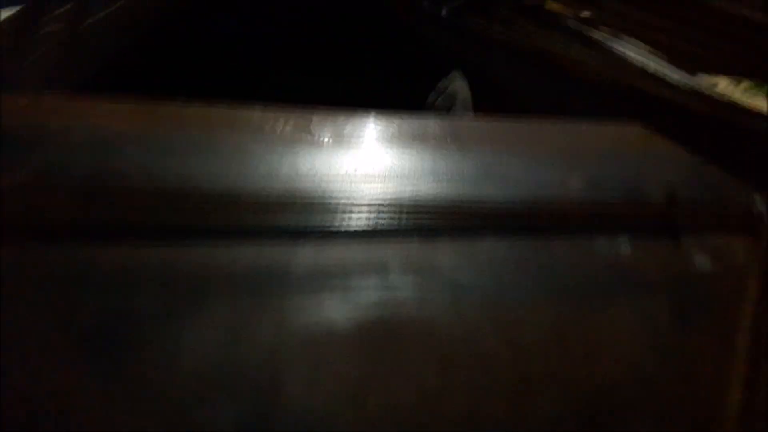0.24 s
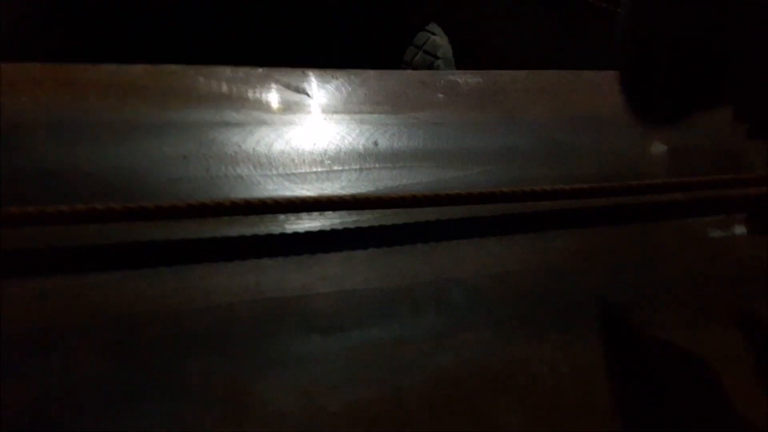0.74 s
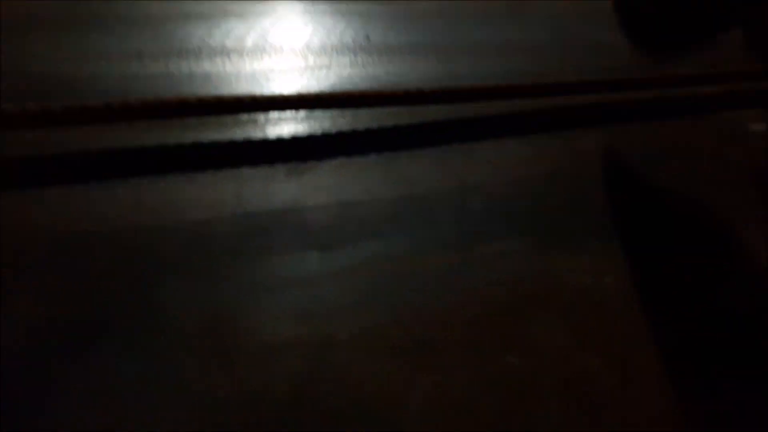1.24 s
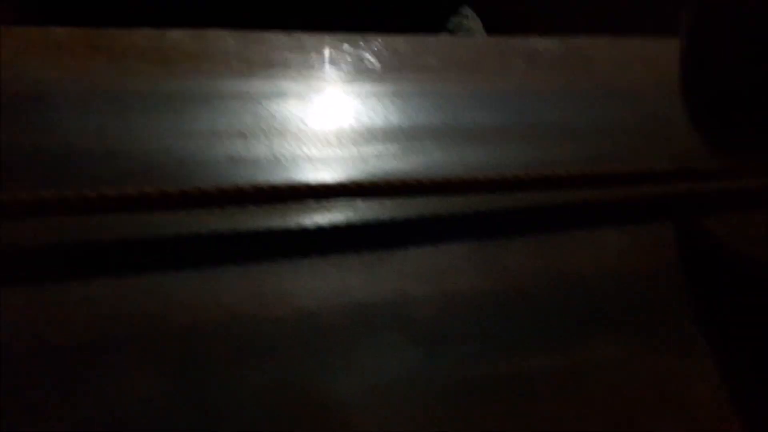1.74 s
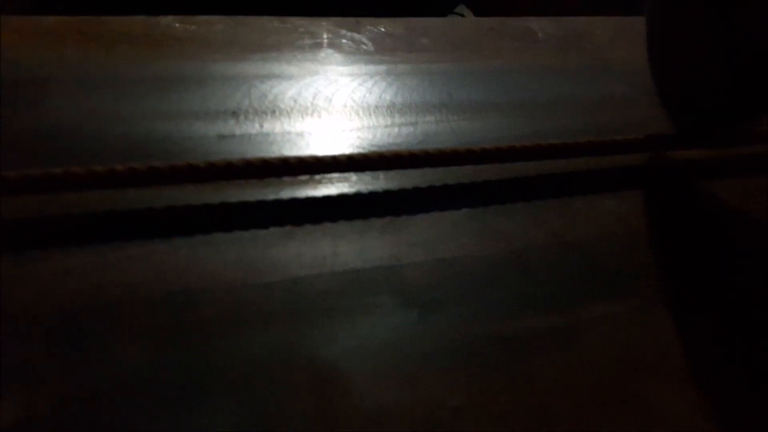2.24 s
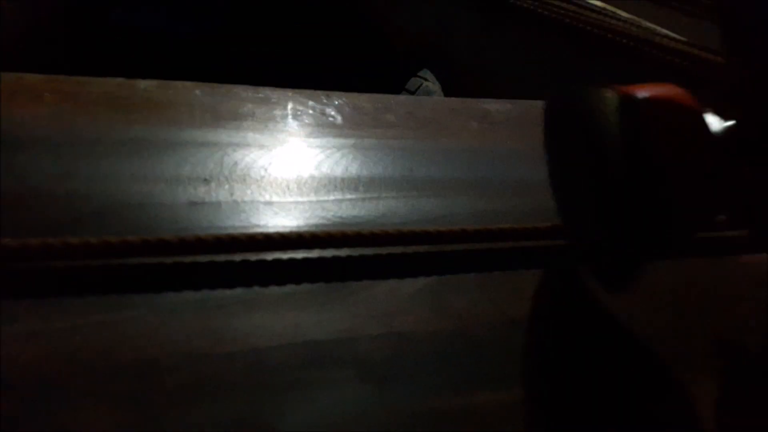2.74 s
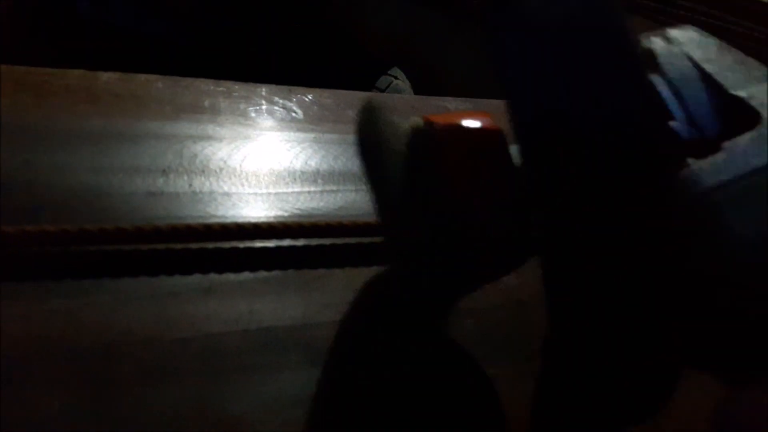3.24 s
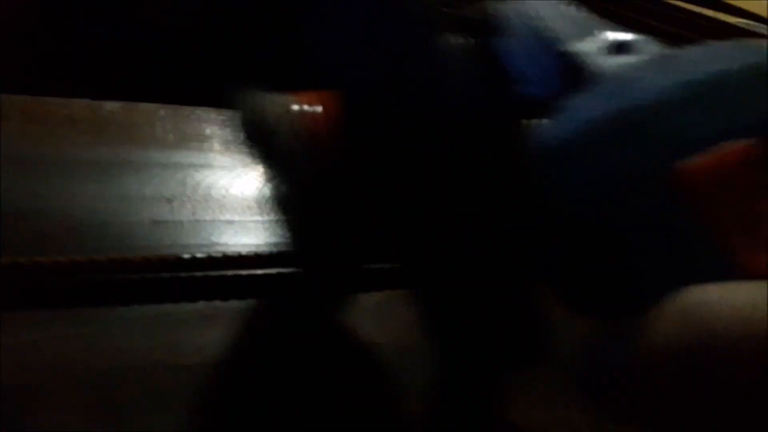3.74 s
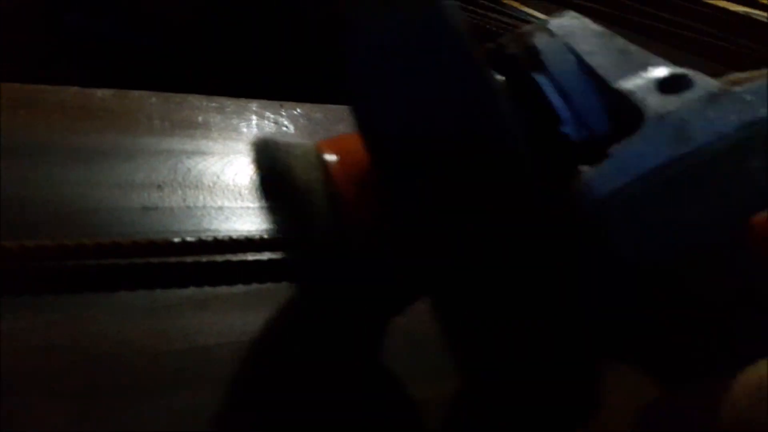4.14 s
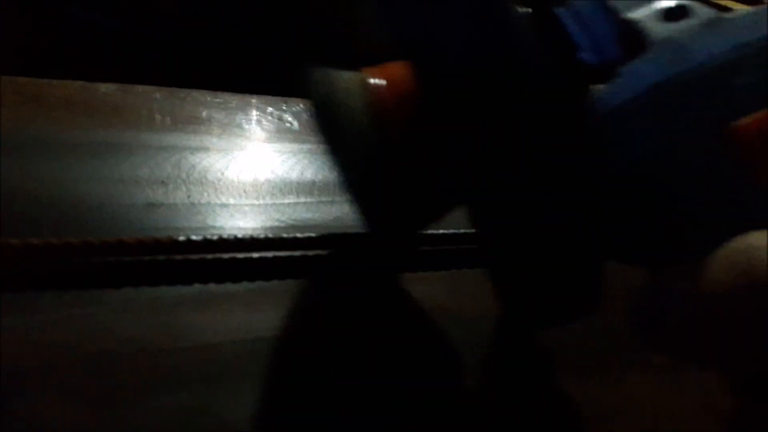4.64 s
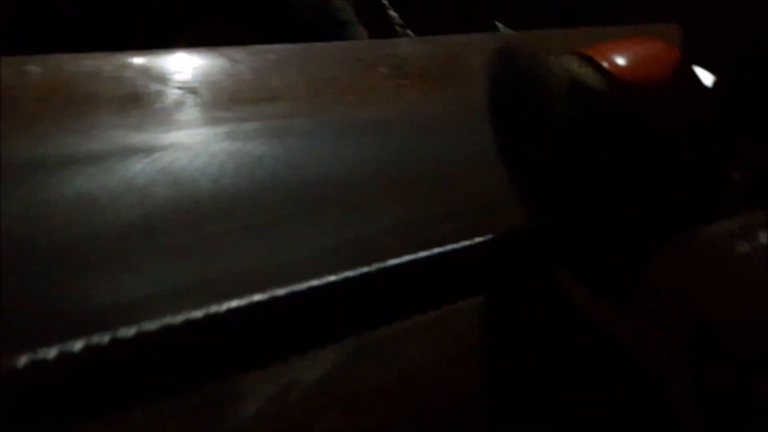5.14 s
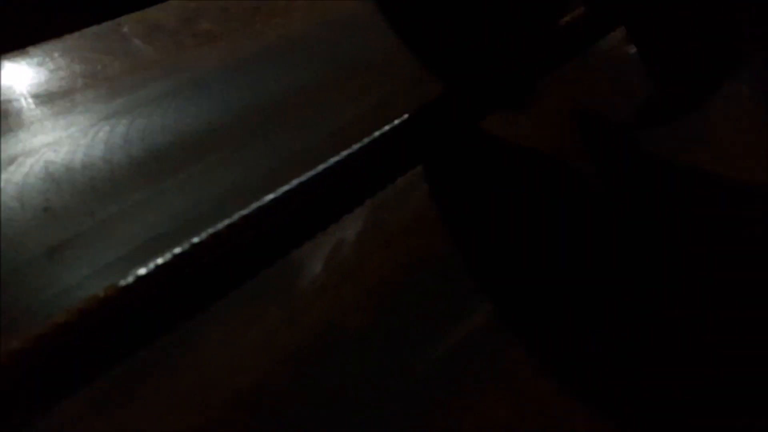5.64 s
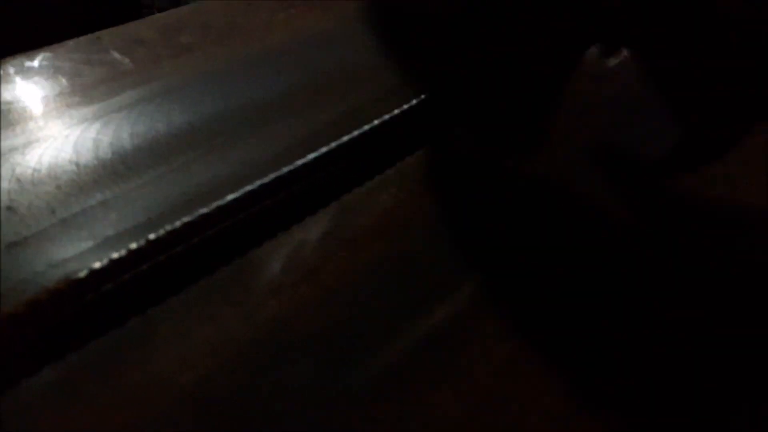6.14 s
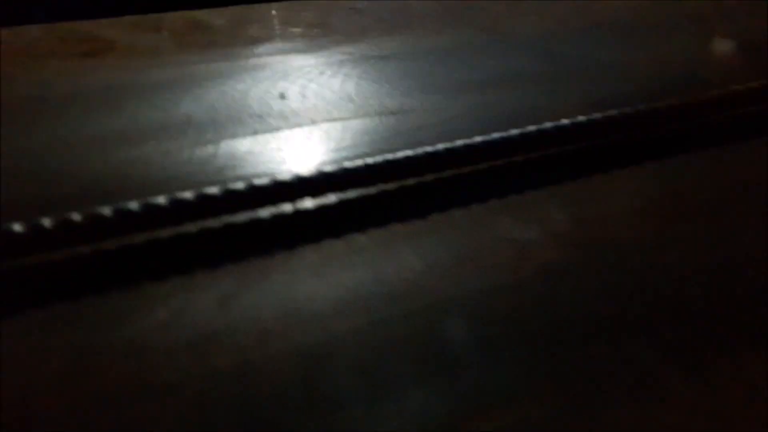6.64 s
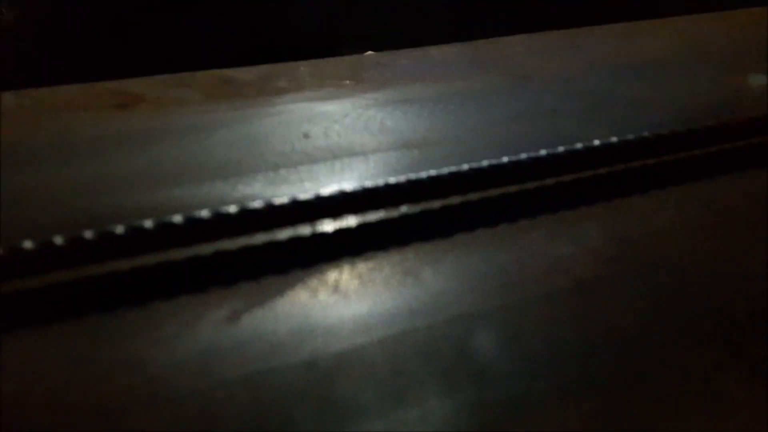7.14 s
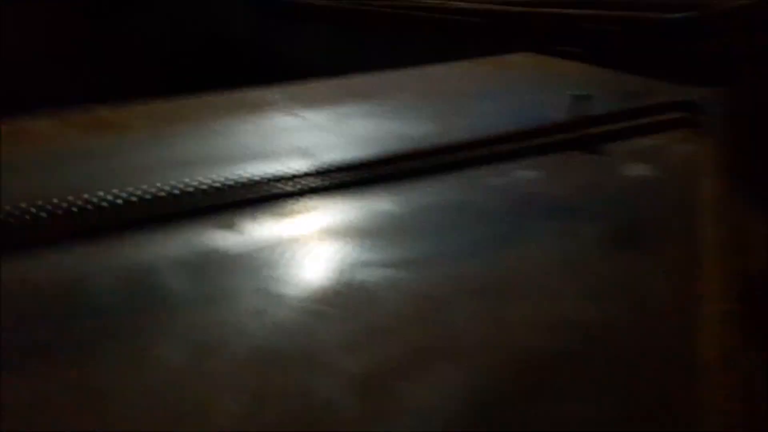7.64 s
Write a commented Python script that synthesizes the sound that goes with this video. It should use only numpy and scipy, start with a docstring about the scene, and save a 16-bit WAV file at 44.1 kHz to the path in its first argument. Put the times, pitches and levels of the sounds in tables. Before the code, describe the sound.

An angle grinder with a wire brush spins up in a loud roar, then drops abruptly to a thin, hissing rasp of wires scrubbing rusty steel.

```python
"""Beside a steel bar on a plate, close to the work: an angle grinder with a wire cup brush spins up and scrubs rust.
A loud, dull roar of filtered impacts and air, surging at twice the mains rate, lies under a rising fan whistle.
Then the sound turns abruptly thin and quieter: a hiss of wire strikes, with bites, grit knocks and one squeal.
Tones follow the armature, which sags at each press of the wires and runs free near the end.
Draught flutters on the two microphone ports as bursts of filtered noise."""
import sys
import numpy as np
from scipy import signal
from scipy.fft import rfft, irfft, next_fast_len
from scipy.io import wavfile
from scipy.ndimage import uniform_filter1d, map_coordinates

SR = 44100
rng = np.random.default_rng(int(sys.argv[2]) if len(sys.argv) > 2 else 0)


def bounce(signal):
    """Save signal as a 16-bit WAV file at the path given by the first command-line argument."""
    frames = np.transpose(np.atleast_2d(signal))
    limited = np.clip(frames, -1, 1)
    pcm = np.round(limited * 32767).astype(np.int16)
    wavfile.write(sys.argv[1], SR, pcm)


N = 347508
T = np.arange(N) / SR  # seconds
THIN_S = 2.527  # the sound turns thin
FREE_HZ, CREST_HZ = 560.7, 513.5  # armature turns a second: running free, crest of the spin-up


def amp(db):
    """Level law: decibels to amplitude gain."""
    return 10 ** (np.asarray(db) / 20)


def unit(x):
    """Normalisation: x scaled to rms 1."""
    return x / np.sqrt(np.mean(x ** 2) + 1e-20)


def ramp(x):
    """Saturation: x held between 0 and 1."""
    return np.clip(x, 0, 1)


def curves(rows):
    """Linear interpolation in time: one value per sample for each column after the time."""
    s, *cols = np.transpose(rows)
    return [np.interp(T, s, c) for c in cols]


def along(points, hz):
    """Spectral interpolation: each column of a table read on a log-frequency axis."""
    f, *cols = np.transpose(points)
    return np.array([np.interp(np.log(hz + 1), np.log(f), c) for c in cols])


def wobble(rate):
    """Slow random modulation: a smooth curve through rate random knots a second."""
    knots = rng.standard_normal(int(N * rate / SR) + 4)
    fine = np.arange(0, len(knots), 1 / 8)
    return np.interp(T * rate, fine, map_coordinates(knots, [fine], mode="nearest"))


def swell(s, half):
    """Gaussian envelope: a rise and fall around s, with standard deviation half, in seconds."""
    return np.exp(-.5 * np.minimum(((T - s) / half) ** 2, 60))


def filtered(x, response):
    """Linear filtering: the spectrum of x times a response of frequency."""
    size = next_fast_len(N + 8192)
    return irfft(rfft(x, size) * response(np.fft.rfftfreq(size, 1 / SR)), size)[..., :N]


def below(hz, edge_hz):
    """Low-pass law: gain falls smoothly through one half at the edge."""
    return 1 / (1 + (hz / edge_hz) ** 4)


def panned(lean_db):
    """Level difference between ports: left and right gains of constant power, positive to the left."""
    gains = amp(np.array([lean_db, -lean_db]).reshape(2, -1) / 2)
    return gains / np.sqrt(np.mean(gains ** 2, axis=0))


def ticks(rate, spread_db):
    """Shot noise: three unrelated streams of tiny impacts of scattered size, rate a second."""
    hit = rng.random((3, N)) < rate / SR
    sizes = amp(spread_db * rng.standard_normal((3, N)))
    return unit(hit * rng.standard_normal((3, N)) * sizes)


def rasp(spindle, rate, spread_db, air, throb):
    """Modulated shot noise: wire tips strike in a rush of air; the uneven brush bites harder once a turn."""
    bite = np.exp(throb * np.sin(spindle + 0.81 * wobble(12)))
    grain = ticks(rate, spread_db) + air * rng.standard_normal((3, N))
    return bite * grain / np.sqrt(np.i0(2 * throb))  # the Bessel term keeps mean power steady


# the tool moves in front of the ports: start_s, left_port_lag_ms
PORT_LAG = [(0, 0.34), (2.5, 0.28), (2.6, 0.068), (3.5, 0.023), (5, 0.032), (6, 0.055), (6.7, 0.11),
            (7.5, 0.12), (7.88, 0.064)]
# likeness of the two ports: frequency_hz, shared_power (0-1)
PORT_LIKENESS = [(100, 0.8), (1500, 0.7), (3000, 0.61), (6000, 0.39), (12000, 0.2), (15000, 0.2)]


def at_ports(streams, colour):
    """Coherence: one stream reaches both ports, the left one later; the other two are scattered sound."""
    lag_ms = curves(PORT_LAG)[0]
    late = map_coordinates(streams[0], [(T - lag_ms / 1000) * SR])
    direct = np.array([late, streams[0]])
    share = lambda hz: ramp(along(PORT_LIKENESS, hz))
    coherent = filtered(direct, lambda hz: np.sqrt(share(hz)))
    scattered = filtered(streams[1:], lambda hz: np.sqrt(1 - share(hz)))
    return unit(filtered(coherent + scattered, lambda hz: amp(along(colour, hz))))


START_HZ, CREST_S, SPIN_CURVE = 170, 2.04, 2.12  # spin-up: first turns a second, crest time, curvature
# time constant of recovery; the rotor's mass rounds off each change of speed over this span
RECOVER_S, INERTIA_S = .18, 0.072
# the brush is pressed on, then eased off: hardest_push_s, armature_sag_hz (before rounding), leaning_in_s
PRESS_TABLE = [(2.57, 22, .3), (2.94, 25, .26), (3.11, 42, .22), (3.57, 41, .19), (3.83, 54, .28),
               (4.21, 20, .6), (4.57, 44, .27), (4.71, 41, .2), (4.96, 31, .29), (5.26, 30, .25),
               (5.41, 46, .18), (5.72, 36, .21), (6.04, 16, .27), (6.239, 16, .12), (7.87, 22, .12)]


def armature_speed():
    """Torque balance: a spin-up that levels and eases back, then free speed less the sag of every press."""
    spin_up = CREST_HZ - (CREST_HZ - START_HZ) * np.abs(1 - T / CREST_S) ** SPIN_CURVE
    sag = np.zeros(N)
    for s, sag_hz, lean_s in PRESS_TABLE:
        push = ramp(1 + (T - s) / lean_s)
        recovery = np.exp(-np.maximum(T - s, 0) / RECOVER_S)
        sag += sag_hz * push * recovery
    worked = FREE_HZ - uniform_filter1d(sag, size=round(INERTIA_S * SR))
    return np.where(T < THIN_S, spin_up, worked)


MAINS_HZ, FIRST_SURGE_S, SURGE_DEPTH = 50.18, .0017, 0.38


def surging(strain):
    """Amplitude modulation: heavy starting current shakes the motor each half cycle, never twice alike."""
    depth = SURGE_DEPTH * strain * np.exp(0.3 * wobble(100.7))
    half_cycles = np.cos(2 * np.pi * 2 * MAINS_HZ * (T - FIRST_SURGE_S))
    return np.exp(depth * half_cycles) / np.sqrt(np.i0(2 * depth))


def settling():
    """Linear decay of the excess level: from 1 to 0 just after the sound turns thin."""
    end_s, fall_s = 3.12, 0.47
    return ramp((end_s - T) / fall_s)


# the brush catches and throws dusty air: start_s (centre), level_db, left_minus_right_db, half_length_s
CATCH_TABLE = [(2.64, -48.5, -20, .02), (2.803, -54, -24, 0.14), (3.252, -58.5, -5, .047),
               (3.705, -57, 16, 0.036), (5.146, -58, -17, 0.12), (5.355, -57.5, 8, 0.052),
               (5.643, -54, 13, 0.049), (5.82, -56.5, -9, 0.027), (6.002, -58, 6, 0.049),
               (6.167, -58.5, 9, 0.036), (6.358, -52, -19, .015), (6.55, -48.5, -28, 0.034),
               (7.84, -57, -6, .021)]


def catching():
    """Power summation: the combined strength of the brush's catches at each port."""
    power = 0
    for s, db, lean_db, half in CATCH_TABLE:
        power = power + (amp(db) * panned(lean_db) * swell(s, half)) ** 2
    return np.sqrt(power)


def draught(catch, load):
    """Turbulent pressure: dusty air crackles on the ports in each catch, with weak stray puffs under load."""
    stray_db, swing_db = -71.5, 4.2
    stray = load * amp(stray_db + swing_db * np.array([wobble(7.4), wobble(9)]))
    lumps = amp(2.7 * np.array([wobble(70), wobble(70)]))
    dust = ticks(rate=1500, spread_db=1.0)[:2]
    flutter = lumps * (dust + .5 * rng.standard_normal((2, N)))
    # frequency_hz, level_db
    colour = [(50, -34), (150, -18), (300, -3.5), (700, 1.5), (1400, 0.0), (2600, -2.0), (5000, -27)]
    return np.hypot(catch, stray) * unit(filtered(flutter, lambda hz: amp(along(colour, hz))))


def tail():
    """Exponential decay: the low mids of the roar ring on briefly."""
    level_db, decay_s = -42, 0.022
    noise = filtered(rng.standard_normal((2, N)), lambda hz: below(hz, 1300) * (1 - below(hz, 300)))
    decay = np.exp(-np.maximum(T - THIN_S, 0) / decay_s)
    return amp(level_db) * decay * unit(noise) * panned(-8)


# flung grit strikes beside the ports: start_s, level_db, left_minus_right_db, upper_edge_hz
KNOCK_TABLE = [(2.618, -47, -20, 1200), (2.635, -45, -22, 900), (2.659, -41, -18, 2000),
               (2.748, -38.5, -20, 1600), (2.815, -45.5, -17, 900), (2.86, -50, -16, 2000),
               (3.026, -49, -20, 1100), (3.72, -51, 14, 1500), (4.757, -52, -14, 1000),
               (5.05, -52, -14, 1400), (5.126, -51, -18, 1300), (5.207, -52, -16, 1200),
               (5.562, -49, 14, 2000), (5.612, -51, 14, 1500), (5.66, -47, 14, 2000),
               (5.674, -47, 18, 2000), (6.357, -52, -18, 1800), (6.365, -42, -18, 2200),
               (6.499, -49, -20, 800), (6.5325, -41, -24, 1700), (6.546, -42, -26, 2800),
               (6.550, -39.5, -26, 2400), (6.5575, -34, -28, 2700), (6.567, -38.5, -26, 3000),
               (6.573, -35, -26, 2900), (6.605, -48, -18, 1500), (7.737, -57, -12, 1200),
               (7.835, -52, -12, 1000)]
KNOCK_LOW_HZ, KNOCK_DECAY_S, KNOCK_ROUGH = 240, 0.0014, 0.14


def knocks():
    """Band-limited impulse: each knock of grit is one dead push with a brief rough tail."""
    out = np.zeros((2, N + SR))
    age = T[:SR // 50]
    window = .0017 * SR  # level_db is the rms over these samples
    for s, db, lean_db, edge_hz in KNOCK_TABLE:
        rough = KNOCK_ROUGH * np.exp(-age / KNOCK_DECAY_S) * rng.standard_normal(len(age))
        band = signal.butter(3, [KNOCK_LOW_HZ, edge_hz], "band", fs=SR, output="sos")
        knock = signal.sosfilt(band, (age == 0) + rough)
        knock = knock * np.sqrt(window / np.sum(knock ** 2))
        out[:, round(s * SR):][:, :len(age)] += amp(db) * knock * panned(lean_db)
    return out[:, :N]


def hum(spindle, pace):
    """Rotating unbalance: the brush shakes the tool once a turn, with harmonics, harder with speed."""
    shake = amp(-55.5) * np.sin(spindle)
    shake += amp(-60.5) * np.sin(2 * spindle)
    shake += amp(-56) * np.sin(3 * spindle + .25 * wobble(60))
    return np.sqrt(2) * shake * ramp((pace - .35) / .3) * amp(wobble(10.9)) * panned(-7)


def squeal():
    """Self-excited vibration: one mode of the bar starts to sing during a push and dies away."""
    start_s, pitch_hz, level_db, decay_s = 4.615, 5500, -42, 0.12
    age = np.maximum(T - start_s, 0)
    level = amp(level_db + 3.0 * wobble(40.2)) * ramp(age / 0.0091) * np.exp(-age / decay_s)
    return level * np.sqrt(2) * np.sin(2 * np.pi * pitch_hz * T + .5 * wobble(120))


# hard clacks in the tool, mostly as the surges jolt the gears: start_s (centre), level_db, half_length_s
CLACK_TABLE = [(.003, -22, 0.0009), (.04, -22, 0.0011), (.09, -22.5, .001), (.13, -24, .001),
               (.17, -25, .001), (.25, -21, .0012), (.269, -22, 0.00088), (.289, -18.5, .001),
               (.398, -20, .0016), (.439, -21, .001), (.457, -21, 0.0018), (.498, -24, 0.00098),
               (.529, -22, 0.00089), (.578, -18, .001), (.619, -18, .0013), (.662, -22, .003),
               (7.619, -37, .0025)]
# colour of a clack: frequency_hz, left_db, right_db
CLACK_SPECTRUM = [(150, -70, -65), (1000, -15, -12), (1900, -1, 0), (3200, -11, -1), (5000, -26, -7),
                  (6800, -37, -11), (9000, -50, -30)]


def clacks():
    """Impact noise: each clack is a hard burst of a few milliseconds."""
    level = sum(amp(db) * swell(s, half) for s, db, half in CLACK_TABLE)
    return level * at_ports(rng.standard_normal((3, N)), CLACK_SPECTRUM)


# modes of the steel under the blows of the wires: pitch_hz, width_hz, level_db (relative)
STEEL_MODES = [(294, 12, -8.5), (402, 12, -7), (1800, 99, 0), (2030, 100, -5), (3710, 90, 1.5),
               (4260, 39, -8)]


def steel(spindle, pace, strain):
    """Modal resonance: wire strikes ring the bar and the plate under it, less as the blows merge."""
    slow_db, fast_db, fade_pace, fade_span = -31.5, -44, 0.59, 0.32
    drive = surging(strain) * rasp(spindle, rate=9000, spread_db=0.5, air=0.53, throb=0.091)[:2]

    def modes(hz):
        total = 0
        for centre, width, db in STEEL_MODES:
            damping = 1j * hz * width
            total = total + amp(db) * damping / (centre ** 2 - hz ** 2 + damping)
        return total

    merged = ramp((pace - fade_pace) / fade_span)
    level = amp((1 - merged) * slow_db + merged * fast_db)
    return level * unit(filtered(drive, modes)) * panned(-12.0)


# rough gear and commutator bands: armature_multiple, level_db, width_hz, fade_pitch_hz
CHATTER_BANDS = [(7, -38.5, 240, 3000), (12, -41.5, 310, 7500), (24, -43, 380, 7400)]
# resonances of the housing: pitch_hz, width_hz, boost_db
HOUSING_MODES = [(2650, 200, 6), (3750, 260, 9.5), (4400, 230, 7.5), (5500, 310, 4), (6900, 600, 7)]


def flares(armature, speed):
    """Resonant crossing: rough bands glide up with the shaft and swell at the housing's resonances."""
    steady_core, break_up_db = 0.49, 2.5
    out = np.zeros((2, N))
    for multiple, db, width_hz, fade_hz in CHATTER_BANDS:
        hz, phase = multiple * speed, multiple * armature
        boost_db = sum(peak_db / (1 + ((hz - centre) / width) ** 2) for centre, width, peak_db in HOUSING_MODES)
        in_phase = (steady_core + wobble(width_hz)) * np.sin(phase)
        band = unit(in_phase + wobble(width_hz) * np.cos(phase))
        level = amp(db + boost_db + break_up_db * wobble(28)) * below(hz, fade_hz) ** 2
        out += level * band * panned(-4.5 * hz / 1000)
    return out


# the fan whistle's level at each pitch, strongest near 14.7 kHz, very faint at the top:
# pitch_hz, level_db (before a fixed trim)
WHISTLE_LEVELS = [(5500, -46), (7300, -42.5), (8100, -48), (10100, -39.5), (11150, -36.5), (12100, -45),
                  (12850, -47), (13400, -33), (14300, -22.5), (14700, -21), (15000, -28), (15660, -25),
                  (15770, -33), (15850, -52)]
FAN_BLADES = 31


def whistle(armature, speed):
    """Blade-passing tone: the fan's pitch, blurred by turbulence, climbs to the edge of hearing."""
    level = amp(along(WHISTLE_LEVELS, FAN_BLADES * speed)[0] - 2.5 + 2.1 * wobble(30.35))
    return level * np.sqrt(2) * np.sin(FAN_BLADES * armature + .5 * wobble(200)) * panned(-26.5)


# tones of armature, bearings and commutator:
# armature_multiple, opening_db (before the starting boost), scrubbing_db, free_db, phase_blur_rad
TONE_TABLE = [(1, -50, -70.5, -62, 0.14), (2, -55, -74.5, -72, 0.28), (3, -53, -69.5, -63.5, 0.29),
              (3.7, -61, -58, -58, 0.13), (4, -50, -67, -56.5, 0.38), (6, -54, -69, -76, 0.59),
              (7.4, -55, -65, -62, .5), (12, -62, -64, -77, 0.73), (14.8, -64.5, -67, -50, 0.62)]


def motor(armature, opening, load, strain):
    """Shaft orders: tones locked to the armature, each wavering in strength and blurred in phase."""
    out = np.zeros((2, N))
    for multiple, opening_db, scrub_db, free_db, blur in TONE_TABLE:
        start_boost_db = 8.0 * strain * (multiple == 1)
        thin_level = amp(load * scrub_db + (1 - load) * free_db)
        level = opening * amp(opening_db + start_boost_db) + (1 - opening) * thin_level
        waver = amp((0.5 + 0.8 * load + 0.5 * opening) * wobble(11))
        lean_db = opening * (-3.5 - 1.5 * multiple) + (1 - opening) * (-1.5 * load - 11 * (1 - load))
        tone = np.sqrt(2) * np.sin(multiple * armature + blur * wobble(130))
        out += panned(lean_db) * level * waver * tone
    return out


# resonances of housing and bar in the roar: start_s (centre), half_length_s, pitch_hz, half_width_hz, boost_db
ROAR_RESONANCES = [(.36, .1, 1050, 220, 4), (.35, .2, 4260, 90, 1), (.08, .12, 1430, 200, -3),
                   (.93, .14, 2700, 200, 2.5), (1.05, 0.15, 860, 200, 1), (1.6, .2, 3500, 170, 3),
                   (2.36, .15, 3850, 110, 5.5)]


def shifting(pair):
    """Time-varying resonance: bands of the roar are shaped in turn, over a weaker random play of colour."""
    patchy_db = 1.0
    hz, s, z = signal.stft(pair, SR, nperseg=1024)
    boost_db = 0
    for at, half, centre, width, db in ROAR_RESONANCES:
        boost_db = boost_db + db * np.exp(-.5 * ((s - at) / half) ** 2) * below(hz[:, None] - centre, width)
    patches = uniform_filter1d(rng.standard_normal(z.shape[1:]), size=6, axis=0)
    patches = uniform_filter1d(patches, size=9, axis=1)
    return signal.istft(z * amp(boost_db + patchy_db * unit(patches)), SR, nperseg=1024)[1][:, :N]


# the opening roar: start_s, rasp_db, body_db (both before fixed trims)
ROAR_LEVELS = [(0, -28, -32), (.17, -25.5, -30), (.34, -23.5, -28), (1.06, -22.5, -24), (1.27, -24.5, -28),
               (1.55, -23, -26), (2.52, -22.5, -26.5)]
# colour of the opening roar: frequency_hz, left_db, right_db
ROAR_SPECTRUM = [(40, -58, -41), (200, -32.5, -28), (397, -22.5, -17), (573, -10, -6), (960, -7, -2.5),
                 (1200, -5.5, -2.5), (1500, -2.5, -0.5), (1890, -4.5, -2.5), (2130, -3.5, 2.5),
                 (2350, -11.5, -0.5), (2700, -14.5, 1), (3000, -13.5, 1), (3600, -21.5, -0.5),
                 (4300, -23, -4), (5040, -28, -7.5), (5350, -30, -4), (6430, -39, -4.5), (6980, -40, -9),
                 (8630, -54, -24), (12100, -39, -16.5), (15000, -42, -19.5)]
# the draught buffets the ports: start_s, end_s, level_db (before a random swing)
BUFFET_TABLE = [(0, 0.933, -49), (2.405, 2.48, -46)]
RUMBLE_DB, BUFFET_EDGE_S, CLUMP_DB = -57.5, 0.033, 1.5  # rumble floor, buffet fade, clumping of the grain


def roar(spindle, pace, strain):
    """Broadband noise of gears, fan and wires: a hard rattle at twice the mains rate that smooths out."""
    rasp_db, body_db = curves(ROAR_LEVELS)
    buffets = np.zeros(N)
    for start, end, db in BUFFET_TABLE:
        buffets += amp(db) * ramp(np.minimum(T - start, end - T) / BUFFET_EDGE_S + .5)
    beats = rasp(spindle, rate=14000, spread_db=1.0, air=0.88, throb=0.04)
    noise = shifting(at_ports(beats, ROAR_SPECTRUM))
    # the airy top comes in only with speed, last on the left
    missing = 1 - np.array([pace ** 2.8, pace ** 1.4])
    noise = noise - missing * filtered(noise, lambda hz: 1 - below(hz, 6600) ** .5)
    low = filtered(noise, lambda hz: below(hz, 2030))
    rumble = filtered(noise, lambda hz: below(hz, 295))
    bass = np.maximum(amp(RUMBLE_DB), buffets) * amp(2.5 * wobble(13)) * unit(rumble)
    rattle = surging(strain) * amp(CLUMP_DB * strain * wobble(380))
    top = amp(rasp_db - 1.65 + 0.27 * wobble(11.67)) * rattle * unit(noise - low)
    lumpy_mids = unit(amp(1.0 * wobble(170)) * (low - rumble))
    body = amp(body_db - 2.0 + 0.39 * wobble(12.4)) * rattle ** 0.69 * lumpy_mids
    return top + body + bass


# the wires bite into rust: start_s (centre), level_db, half_length_s, pitch_hz
BITE_TABLE = [(3.3, -51, 0.098, 6800), (3.75, -34, 0.079, 6000), (4.132, -42, 0.093, 8200),
              (4.33, -38.5, 0.049, 7800), (4.578, -35, 0.12, 6000), (5.103, -40, 0.1, 6300),
              (5.985, -39.5, .037, 6000), (6.157, -39, 0.044, 6500), (7.8, -38.5, .055, 8000)]
# colour of a bite: frequency_hz, level_db
BITE_SPECTRUM = [(200, -75), (1200, -40), (3000, -8), (4800, -3.5), (7300, 0), (10500, -2), (13000, -8),
                 (15500, -15)]
BITE_RING_DB, BITE_WIDTH_HZ = 5, 490  # boost and half width of the ring


def bites(spindle):
    """Resonant friction: each bite is a short swell of brighter scratching that rings at its own pitch."""
    scratch = rasp(spindle, rate=8200, spread_db=2.5, air=0.7, throb=0.12)[:2]
    out = np.zeros((2, N))
    for s, db, half, ring_hz in BITE_TABLE:
        ring_db = lambda hz: BITE_RING_DB * below(hz - ring_hz, BITE_WIDTH_HZ)
        ringing = unit(filtered(scratch, lambda hz: amp(along(BITE_SPECTRUM, hz) + ring_db(hz))))
        out += amp(db) * swell(s, half) * ringing
    return out * panned(1.6)


# a hollow in the hiss: start_s, pitch_hz, depth_db (negative is a slight hump)
HOLLOW_PATH = [(5.3, 9600, 0), (5.85, 9100, 3), (6.12, 8880, 6), (6.3, 8100, 0), (7, 6900, 0.5),
               (7.5, 6700, 2), (7.7, 6700, -1.5)]
HOLLOW_WIDTH_HZ = 490


def hollowed(pair):
    """Moving spectral notch: a narrow hollow slides down through the hiss as the tool is turned."""
    hz, s, z = signal.stft(pair, SR, nperseg=512)
    times, centres, depths = np.transpose(HOLLOW_PATH)
    notch = below(hz[:, None] - np.interp(s, times, centres), HOLLOW_WIDTH_HZ)
    dip_db = np.interp(s, times, depths) * notch
    return signal.istft(z * amp(-dip_db), SR, nperseg=512)[1][:, :N]


# the thin hiss as the tool is moved about:
# start_s, level_db (before settling excess and trims), left_minus_right_db
HISS_LEVELS = [(3.05, -38, -7), (3.3, -35.5, -6.5), (3.95, -38, -6), (4.06, -36, -6.5), (4.3, -36, -6.5),
               (4.9, -38.5, -6.5), (5.15, -37, -14), (5.45, -39.5, -6.5), (5.85, -35, -7.5),
               (6.24, -36.5, -8), (6.34, -35, -9.5), (6.6, -37, -7.5), (7, -36, -7), (7.88, -36, -7.5)]
# colour of wires on steel: frequency_hz, left_db, right_db
SCRUB_SPECTRUM = [(100, -61, -53), (300, -46, -37), (500, -39, -30.5), (830, -35.5, -28),
                  (1700, -21, -16.5), (2240, -10.5, -10), (3860, -7.5, -4), (6000, -3, -1.6),
                  (7640, -8, -3.5), (10700, -9.5, 0.5), (11700, -11.5, -2), (13100, -12.5, 1),
                  (14100, -21, -2), (15200, -23, -1.5), (15700, -29, -7)]
# colour of the free-running tool: frequency_hz, left_db, right_db
FREE_SPECTRUM = [(100, -68, -54), (320, -60, -41), (480, -48, -31), (780, -40.5, -29.5), (1640, -25.5, -20),
                 (2230, -17.5, -11.5), (3420, -11, -7.5), (4520, -13, -11), (6500, -7.5, -5.5),
                 (8400, -9, -8), (10900, -19.5, -7.5), (12800, -16, -5), (13500, -33, -11),
                 (14800, -27, -0.5), (15800, -40, -13)]
SETTLE_HISS_DB, SIZZLE_DB = 7.5, 1.5  # excess as the thin sound sets in; offset of the hiss's top


def hiss(spindle, load):
    """Friction noise: wires scratch the steel under load; without it only fan and brush whip the air."""
    level_db, lean_db = curves(HISS_LEVELS)
    scrape_db = level_db + SETTLE_HISS_DB * settling()
    sizzle_db = scrape_db + SIZZLE_DB + 0.93 * load * wobble(9)
    strikes = rasp(spindle, rate=12000, spread_db=2.0, air=1.08, throb=0.029)
    scrub = at_ports(strikes, SCRUB_SPECTRUM)
    free = at_ports(rng.standard_normal((3, N)), FREE_SPECTRUM)
    mixed = np.sqrt(load) * scrub + np.sqrt(1 - load) * free
    pair = np.array([unit(side) for side in mixed]) * panned(lean_db)
    # the low end of the hiss comes and goes
    low_gain = amp(-1.2 + (1.8 + 1.0 * load) * wobble(15))
    pair = pair + (low_gain - 1) * filtered(pair, lambda hz: below(hz, 1300))
    scrape = filtered(pair, lambda hz: below(hz, 9060))
    body = amp(scrape_db - 1.5) * unit(scrape) + amp(sizzle_db - 1.65) * unit(pair - scrape)
    # a narrow, very high sheen sits on top of the hiss
    sheen = unit(filtered(rng.standard_normal((2, N)), lambda hz: below(abs(hz - 14850), 110)))
    return (body + amp(sizzle_db - 13) * sheen * panned(-22)) * amp(0.85 * load * wobble(25))


GEAR = 3.7  # armature turns to one spindle turn
FULL_SAG_HZ, INRUSH_S = 23.8, .65  # sag at full contact; fading time of the starting surges
SETTLE_TONES_DB = 6.5  # excess of the tones as the thin sound sets in


def scene():
    """Superposition: armature speed drives every shaft tone; its sag tells how hard the brush is pressed."""
    speed = armature_speed()
    armature = 2 * np.pi * np.cumsum(speed * (1 + 0.000573 * wobble(12))) / SR
    spindle = armature / GEAR
    pace = ramp(speed / CREST_HZ)
    load = ramp((FREE_HZ - speed) / FULL_SAG_HZ)
    opening = ramp((THIN_S - T) / 0.0066 + .5)
    strain = np.exp(-T / INRUSH_S)
    catch = catching()
    loud = hum(spindle, pace) + steel(spindle, pace, strain)
    loud += ramp((pace - .42) / 0.15) * surging(strain) * flares(armature, speed)
    loud += whistle(armature, speed) + roar(spindle, pace, strain)
    thin = draught(catch, load) + tail() + knocks() + squeal()
    thin += bites(spindle) + hollowed(hiss(spindle, load))
    # the tones only sing out once the motor has gathered some speed
    tones = motor(armature, opening, load, strain) * ramp((pace - .35) / 0.22)
    tones = tones * amp(SETTLE_TONES_DB * (1 - opening) * settling())
    return opening * loud + (1 - opening) * thin + tones + clacks()


def record(dry):
    """Low-pass filtering: nothing sounds above the upper limit."""
    top_hz = 15870
    return filtered(dry, lambda hz: hz < top_hz)


dry = scene()
out = record(dry)
bounce(out)
```